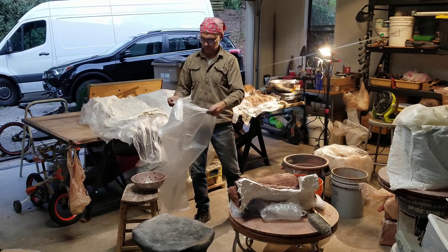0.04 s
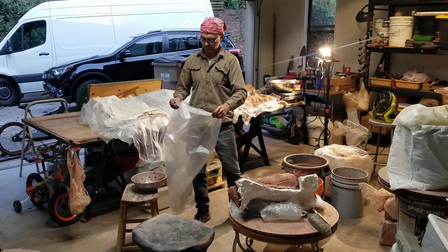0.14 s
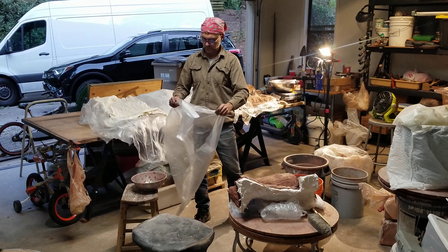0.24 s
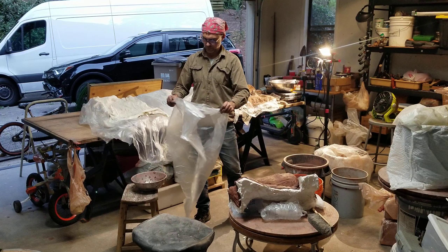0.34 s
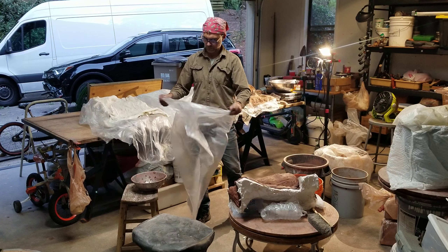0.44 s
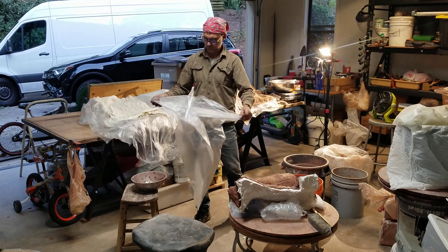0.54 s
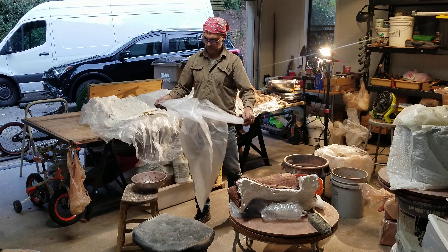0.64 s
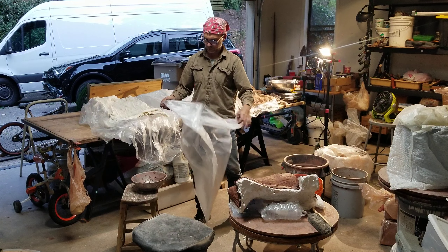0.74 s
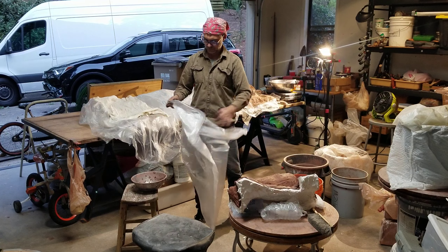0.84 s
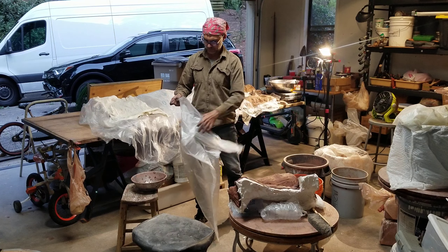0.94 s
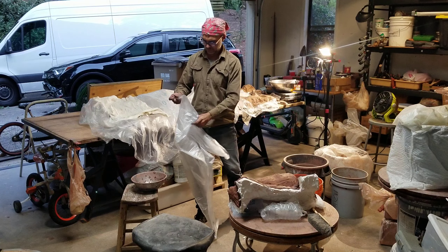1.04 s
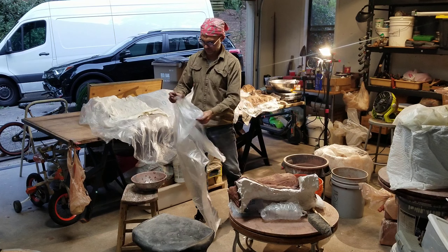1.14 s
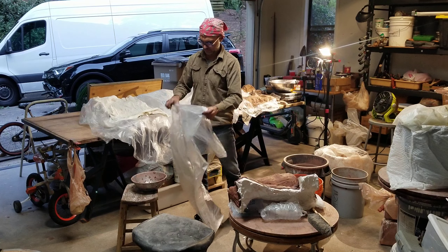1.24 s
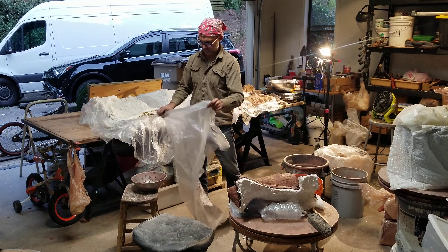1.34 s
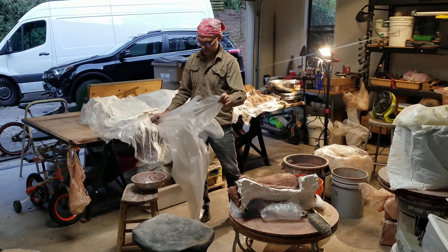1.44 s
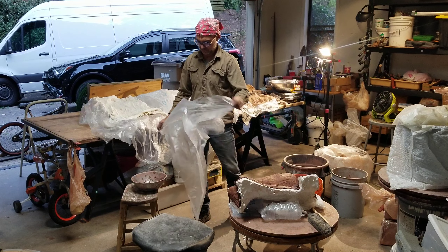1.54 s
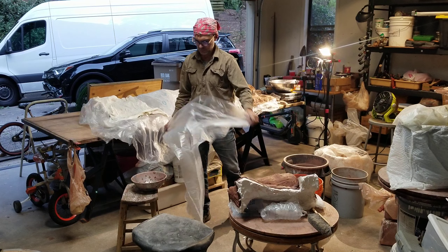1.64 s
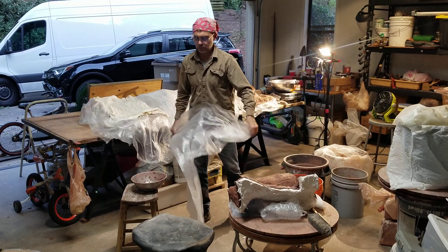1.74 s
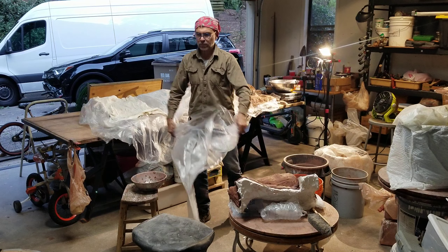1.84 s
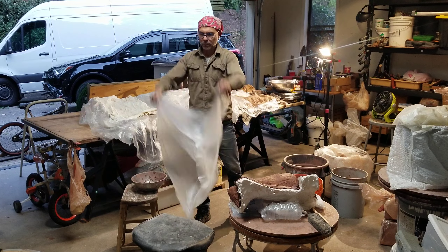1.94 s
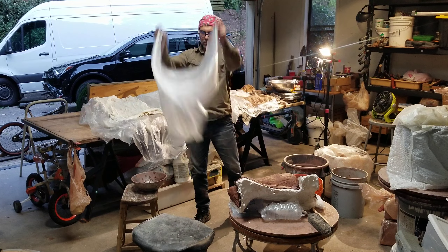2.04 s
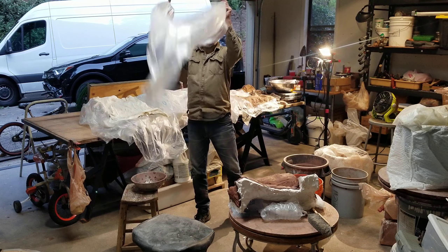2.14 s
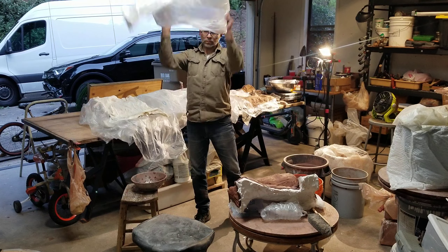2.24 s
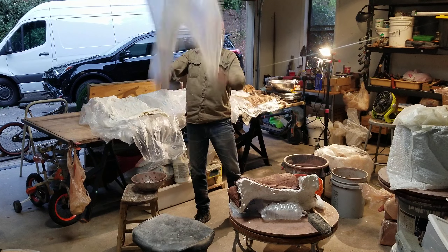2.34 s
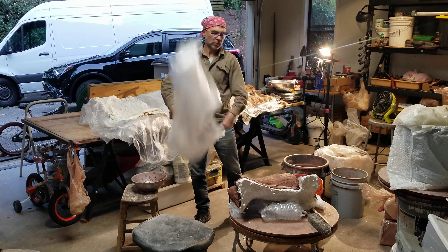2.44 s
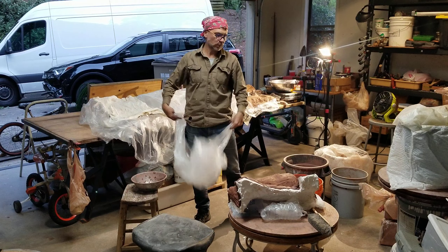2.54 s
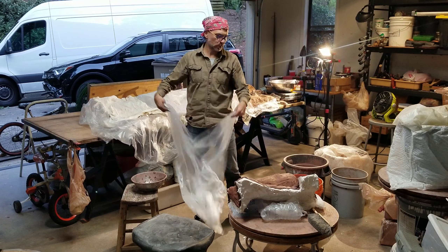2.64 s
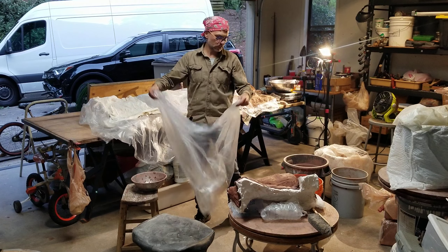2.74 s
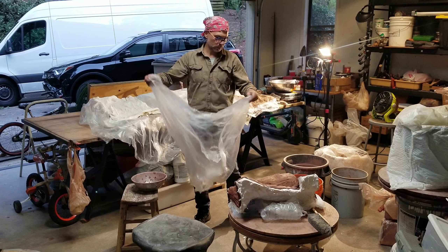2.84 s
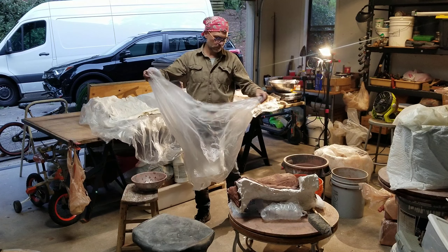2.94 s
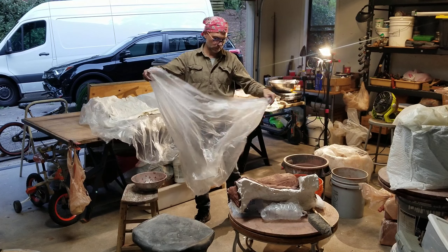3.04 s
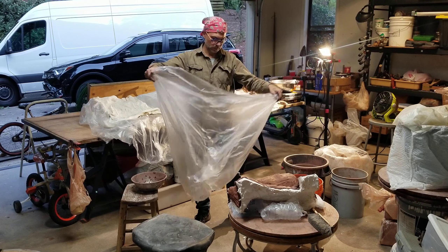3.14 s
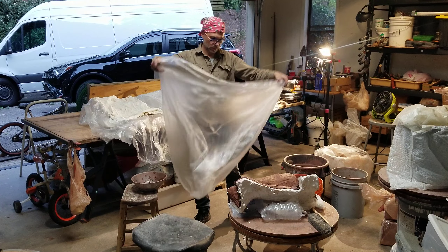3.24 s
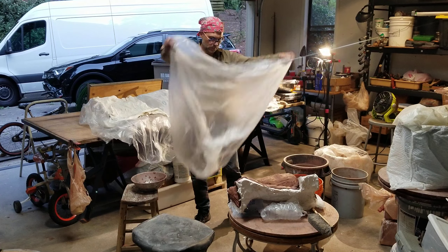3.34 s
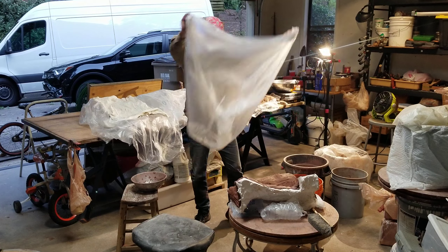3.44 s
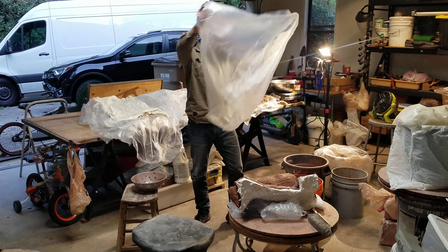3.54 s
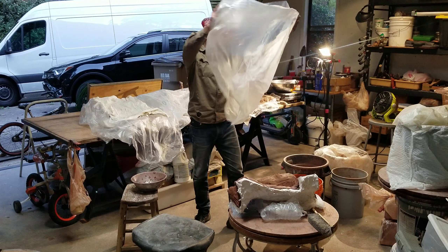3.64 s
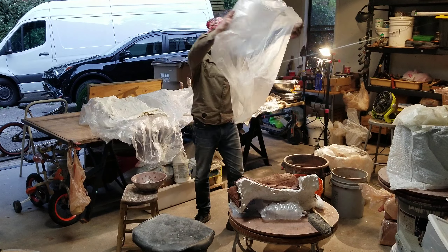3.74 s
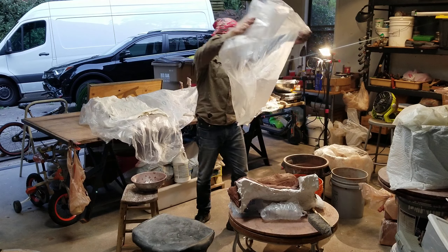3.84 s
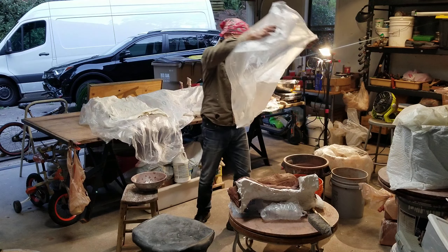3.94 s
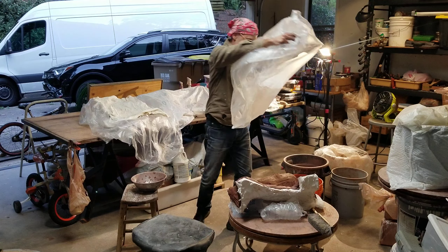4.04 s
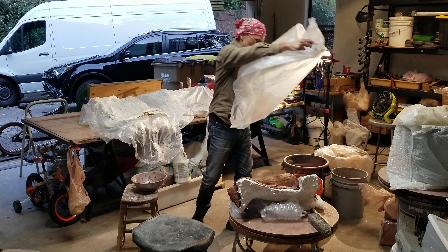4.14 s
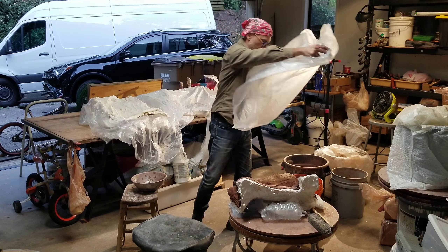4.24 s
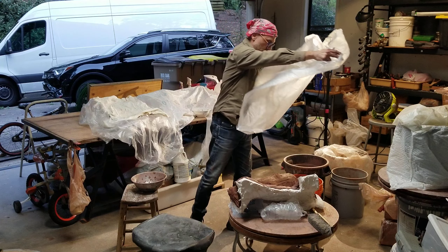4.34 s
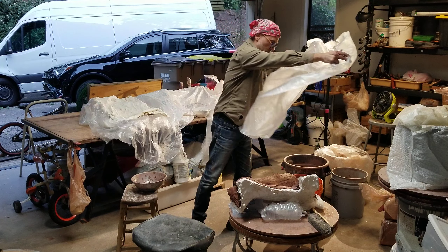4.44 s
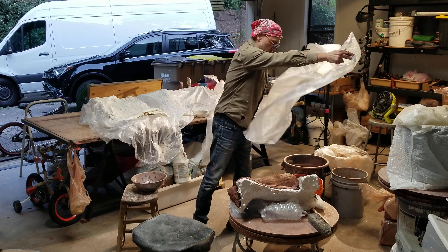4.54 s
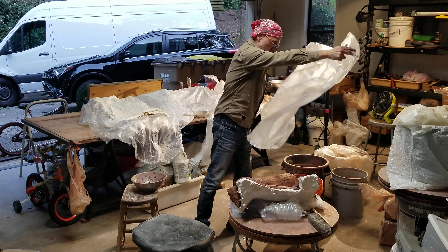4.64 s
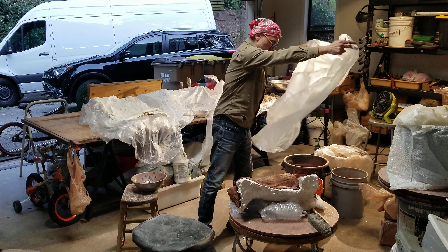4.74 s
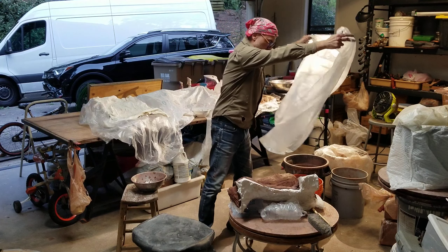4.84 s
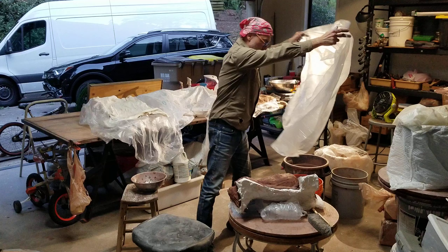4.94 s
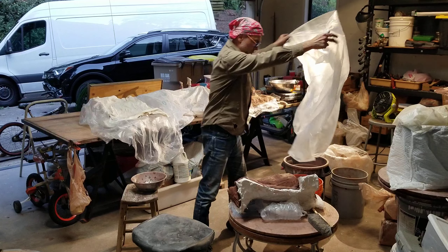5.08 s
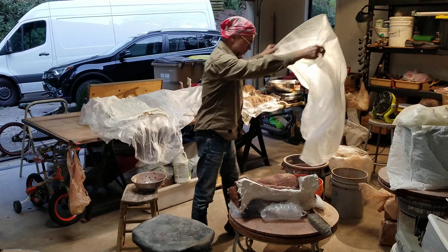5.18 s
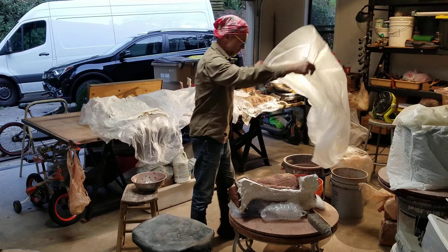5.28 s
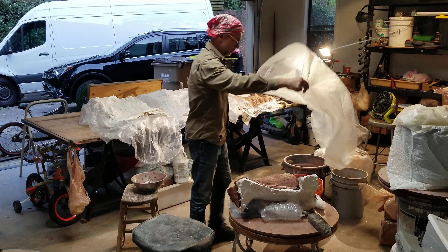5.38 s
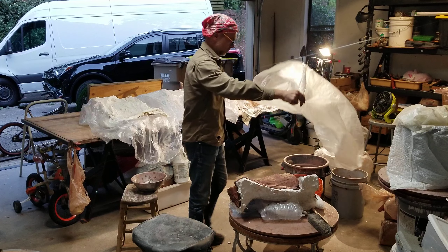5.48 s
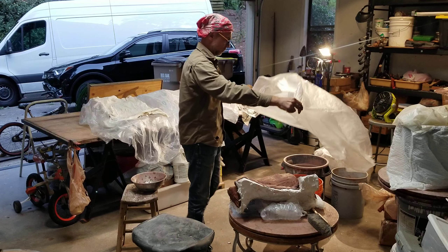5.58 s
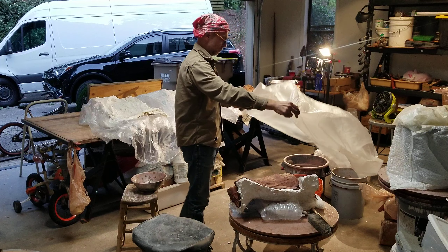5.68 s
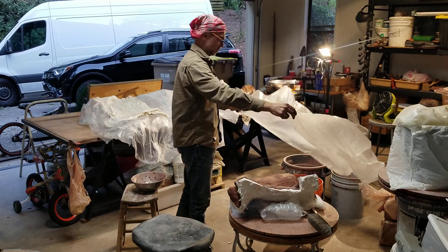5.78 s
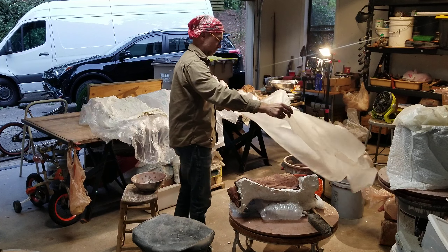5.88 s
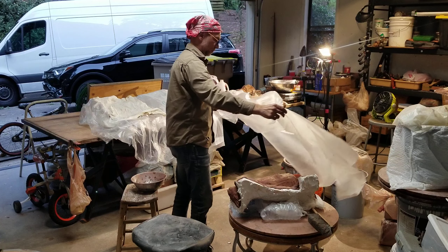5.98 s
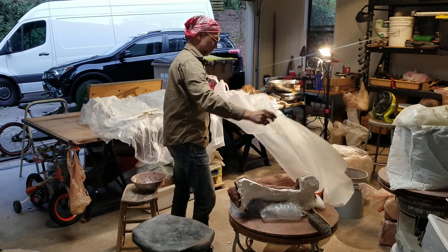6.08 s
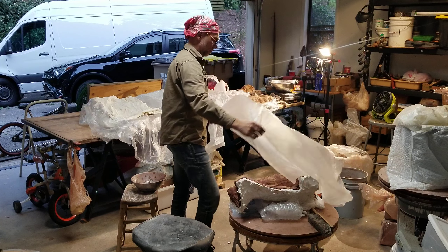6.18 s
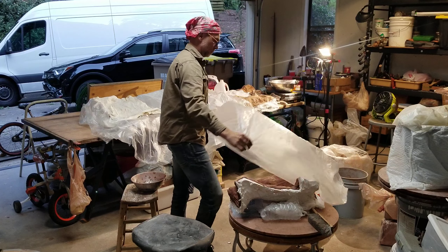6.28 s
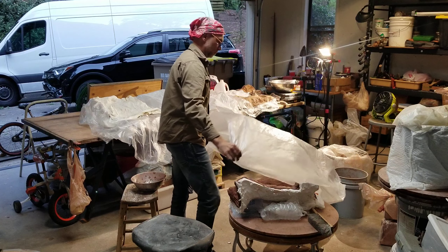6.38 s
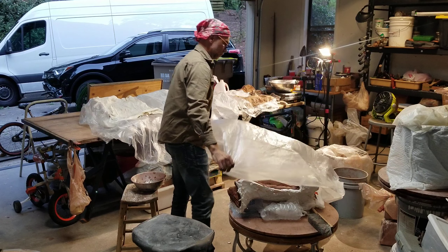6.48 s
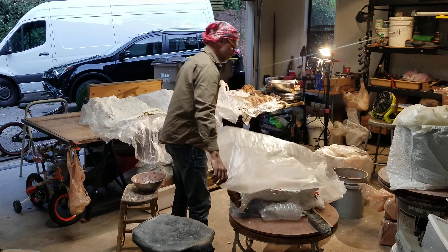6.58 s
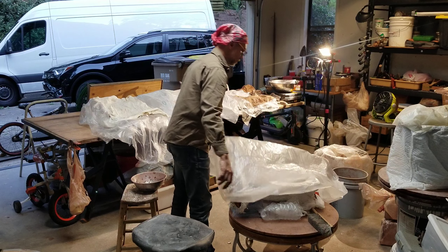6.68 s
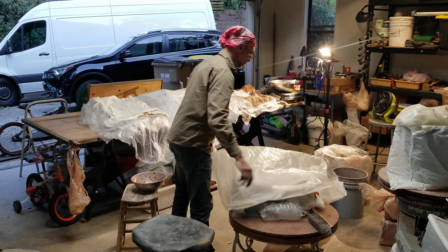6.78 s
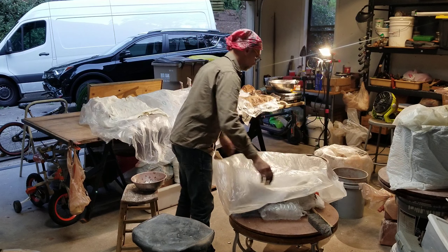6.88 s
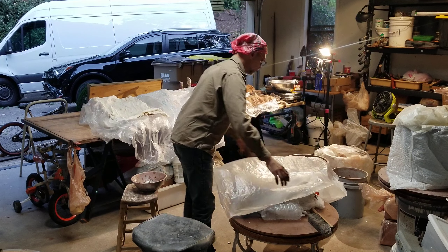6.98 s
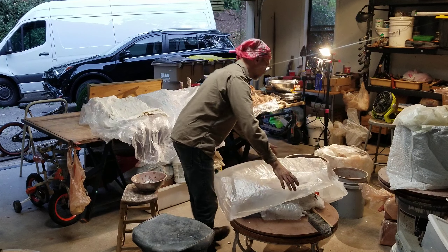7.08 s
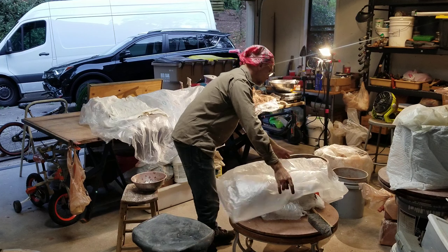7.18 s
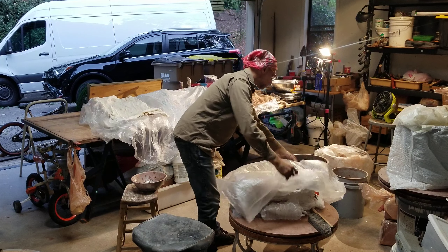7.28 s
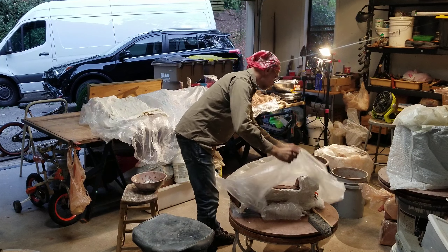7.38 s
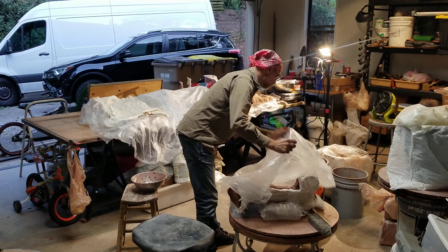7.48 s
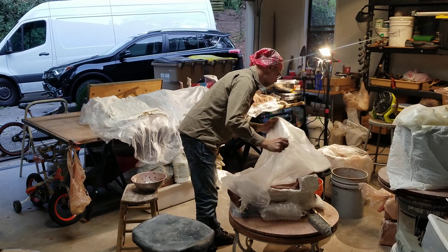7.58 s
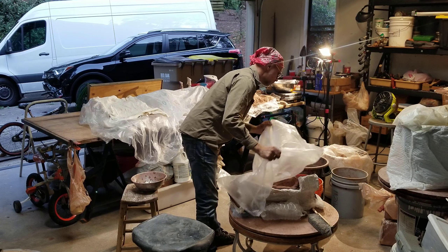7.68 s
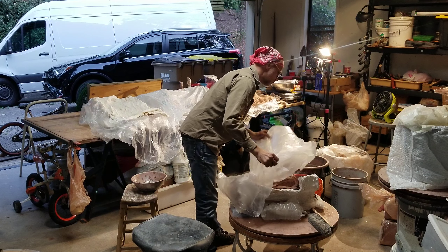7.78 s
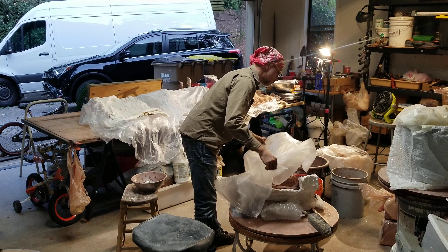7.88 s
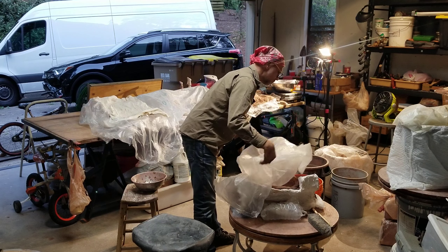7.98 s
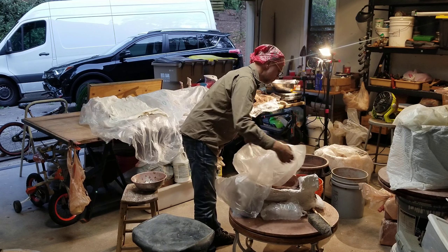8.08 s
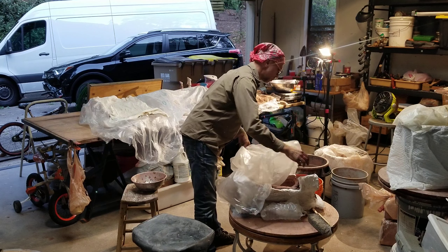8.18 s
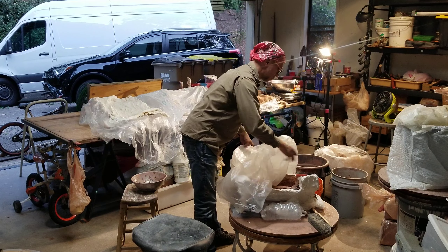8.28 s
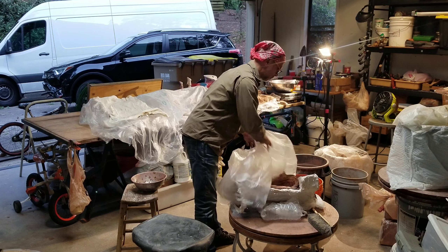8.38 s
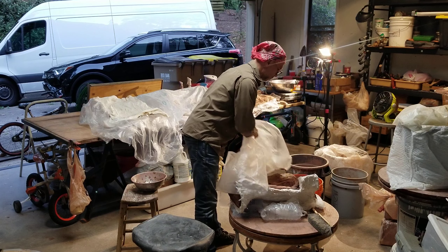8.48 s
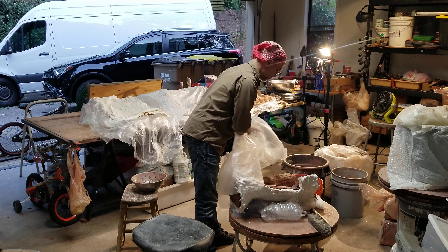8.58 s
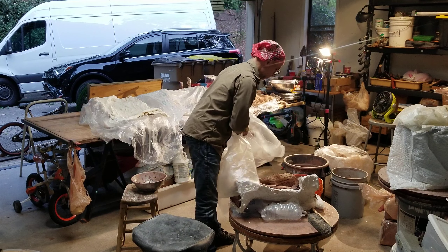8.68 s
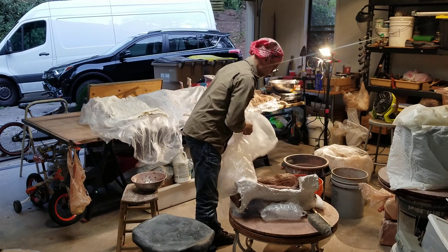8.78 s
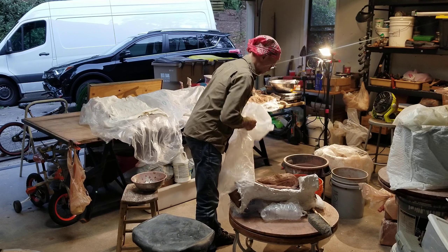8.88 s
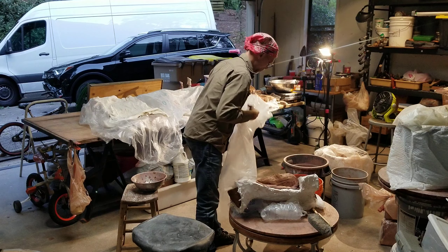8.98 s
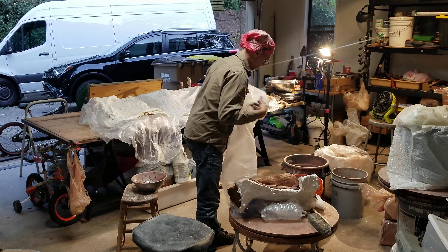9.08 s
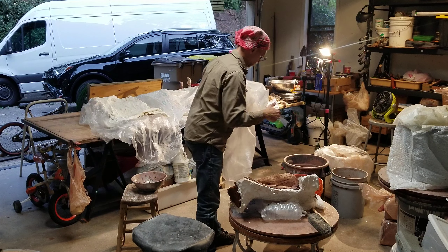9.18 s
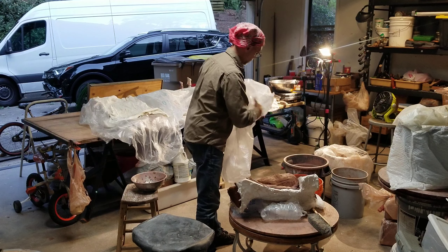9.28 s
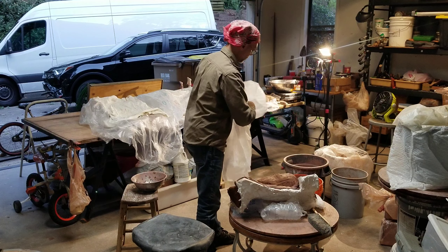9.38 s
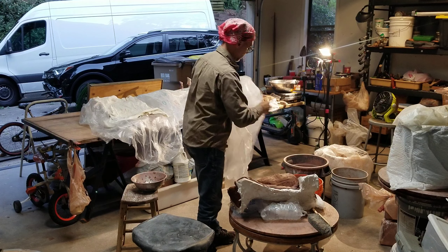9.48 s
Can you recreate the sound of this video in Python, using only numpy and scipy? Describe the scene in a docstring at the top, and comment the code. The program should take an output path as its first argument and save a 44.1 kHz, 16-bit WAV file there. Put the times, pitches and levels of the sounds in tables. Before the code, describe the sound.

Thin plastic film rustling continuously a few steps away, with two sharp, airy shakes early on, in a reverberant workshop.

```python
"""A thin plastic sheet crinkles as it is handled, shaken out twice and draped over clay in a garage.
Thousands of tiny creases buckle each second, each radiating a click, and large folds crumple under them.
Each shake displaces a puff of air, and the second slaps the film taut; once, it squeaks in the grip.
Soft footfalls and a low hum lie beneath. The sheet is a few steps away, so most of its sound
reaches the two microphone ports as reverberation."""
import sys
import numpy as np
from scipy import signal
from scipy.fft import rfft, irfft, next_fast_len
from scipy.io import wavfile

SR = 44100
rng = np.random.default_rng(int(sys.argv[2]) if len(sys.argv) > 2 else 0)


def waveform_to_disk(signal):
    """Save audio, clipped to [-1, 1], as 16-bit WAV at the path in sys.argv[1]."""
    frames = np.transpose(np.atleast_2d(signal))
    scaled = np.clip(frames, -1, 1) * 32767
    samples = np.round(scaled).astype(np.int16)
    wavfile.write(sys.argv[1], SR, samples)


N = 419812
TIME = np.arange(N) / SR

# Pulls, shakes and sweeps of the sheet. Each row: peak time in seconds, level in dB, rise and fall
# time constants in seconds.
STROKES = [(0.003, -37.5, 0.07, 0.2), (0.187, -43, 0.1, 0.42), (0.545, -31.0, 0.14, 0.056),
           (0.718, -41, 0.063, 0.054), (0.854, -38.5, 0.1, 0.062), (1.036, -41, 0.1, 0.14),
           (1.207, -38.5, 0.1, 0.18), (1.389, -33.0, 0.17, 0.19), (1.668, -41, 0.15, 0.31),
           (1.95, -22.0, 0.038, 0.099), (2.029, -32.5, 0.22, 0.04), (2.367, -20.5, 0.028, 0.08),
           (2.739, -35.5, 0.27, 0.15), (3.138, -46.5, 0.12, 0.27), (3.406, -38.5, 0.28, 0.28),
           (3.759, -42.5, 0.2, 0.4), (4.78, -43, 0.12, 0.29), (5.005, -44.5, 0.17, 0.24),
           (5.204, -42.5, 0.25, 0.34), (5.607, -46, 0.17, 0.13), (5.893, -41, 0.19, 0.16),
           (6.14, -40, 0.1, 0.18), (6.368, -41, 0.15, 0.13), (6.542, -45.5, 0.23, 0.36),
           (6.939, -48, 0.24, 0.1), (7.23, -40, 0.071, 0.39), (7.432, -33.5, 0.22, 0.19),
           (7.733, -38, 0.13, 0.17), (8.05, -38.5, 0.15, 0.23), (8.399, -33.0, 0.064, 0.16),
           (8.76, -39, 0.29, 0.25), (8.976, -41.0, 0.25, 0.095), (9.127, -42, 0.12, 0.15),
           (9.342, -35, 0.041, 0.16), (9.513, -33.5, 0.07, 0.027)]
HELD_DB, EASY_DB = -56, -40  # crinkle of the sheet held still, and in an easy stroke
UNEVEN_DB, CATCHES_PER_S = 0.45, 20  # the film catches and slips within each stroke
# Spectra of creases, folds, puffs and outdoor rumble. Each row: frequency in Hz, relative level in dB.
CREASE_SPECTRUM = [(500, -7.6), (1200, -3.8), (2200, -0.4), (3000, -0.1), (5200, 0.0), (6400, -2.3),
                   (7200, -4.6), (8200, -4.4), (9300, -6.8), (10300, -5.2), (11300, -2.1), (12500, -0.3),
                   (14200, -3.2), (15600, -7.0)]
FOLD_SPECTRUM = [(100, -20), (135, -12), (200, -13.5), (280, -8.5), (340, 0.5), (420, -1.5), (520, -0.5),
                 (620, -1), (880, 1), (1400, 3), (2200, 9.5)]
PUFF_SPECTRUM = [(12, -51), (25, -20), (45, -10), (80, -3), (130, -5), (190, -4.5), (270, -8), (400, -29),
                 (800, -61)]
RUMBLE_SPECTRUM = [(15, -46), (30, -6), (55, 3), (85, -13), (135, -2.5), (200, -11), (500, -12.5),
                   (2000, -9.5), (15000, -66)]
# Layers that follow the strokes. Each holds: level at an easy stroke in dB, dB gained per dB of
# crinkle, lag in seconds.
SMALL_FOLD_LAW = (-52.5, 1.146, 0.0073)
WIDE_FOLD_LAW = (-65.5, 1.36, 0.0099)
BOOM_LAW = (-74, .35, .02)
# Folds grow louder as the sheet bunches. Each row: time in seconds, gains of small and wide folds in dB.
BUNCHING = [(0, 1, 3.5), (.7, -0.5, 3), (.95, -1, -2), (1.4, -2, 1), (1.78, -1, 0.5), (2.02, 1.5, 6),
            (2.38, 3.5, 3), (2.72, -2, 0.5), (4.5, -1.5, -2.5), (5.1, -1.5, 0.5), (5.55, -1, -5),
            (6.1, 1, 4.5), (6.5, 0, 0.5), (6.85, 0, -7), (7.45, -1, 1), (8.05, 0, -1.5), (9.2, 0.5, 3)]
# Air pushed by the fastest sweeps. Each row: peak time in seconds, level in dB, rise and fall
# time constants in seconds.
PUFFS = [(1.965, -40, 0.028, 0.067), (2.415, -38, 0.028, 0.044), (7.48, -60.5, 0.14, 0.17),
         (8.45, -68, .08, 0.13)]
STILL_DB, RUMBLE_DB = -89, -71  # air between the puffs; outdoor rumble
# The film jerks taut. Each row: time in seconds, relative level in dB, pitch in Hz, decay in seconds.
SLAPS = [(2.36, -24, 1700, 0.0039), (2.3659, -30, 600, 0.0033), (2.4072, -18, 570, 0.0045)]
# The sheet swings to a stop: start in seconds, level in dB, pitch in Hz, decay in seconds.
THUMP = (2.405, -31, 64, 0.07)
# Single stiff creases. Each row: start in seconds, relative level in dB.
POPS = [(0.545, -26), (1.923, -16), (2.376, -25), (5.562, -34), (5.607, -35), (6.546, -36), (7.417, -28),
        (7.54, -26), (8.061, -27.5)]
# Slips in the grip. Each row: start in seconds, length in seconds, pitch in Hz, relative level in dB.
SQUEAKS = [(7.16, 0.11, 1595, -49)]
# Thuds of the shoes. Each row: start in seconds, relative level in dB, pitch in Hz.
STEPS = [(6.33, -67, 60), (6.495, -61, 62), (6.5, -59, 134), (6.51, -62, 210), (6.999, -65, 58),
         (7.262, -50, 56.5)]
# Cavities among benches and pots. Each row: frequency in Hz, relative level in dB, T60 in seconds.
HOLLOWS = [(275, -46, 0.23), (413.4, -39.5, 0.19), (706, -42, 0.1), (796, -34.5, 0.087), (918, -45, .15),
           (1150, -56, .2), (1639, -47, .2)]
# Reverberation of the garage. Each row: frequency in Hz, T60 in seconds.
GARAGE_T60 = [(100, 0.72), (500, 0.25), (2000, 0.8), (6000, 0.88), (15000, 0.2)]
# Unequal colour of the ports. Each row: frequency in Hz, level of left over right in dB.
PORT_BALANCE = [(100, 0.8), (1000, 1.3), (2500, 2.4), (5000, 3.9), (6400, -0.7), (7200, -8.0),
                (8200, -15.1), (9000, -18.5), (10000, -13.4), (11500, -9.6), (13200, -5.4), (14500, -8.2),
                (15500, -8.7)]
FIRST_NULL_HZ = 1040  # port spacing leaves the diffuse sound uncorrelated at multiples of this
BAND_LIMIT_HZ = 15780


def crinkle(level_db, highpass_hz=1400, fizz_hz=7000, fizz_db_per_db=0.1478):
    """Buckling of tiny creases: faster movement sets off more of them and makes them brighter."""
    per_s = 5000 * gain_of(.5 * (level_db + 39.5))
    clicks = buckling(per_s, spread_db=2.5, clump_db=1.5, direct=0.7, hollow=.03, patches=9)
    clicks /= np.sqrt(per_s)  # keeps power independent of click rate
    sound = evened(shaped(clicks, lambda f: gain_of(read(CREASE_SPECTRUM, f))
                          * f ** 3 / np.sqrt(f ** 6 + highpass_hz ** 6)))
    fizz = shaped(sound, lambda f: f ** 2 / (f ** 2 + fizz_hz ** 2))
    fizz_gain = gain_of(fizz_db_per_db * (level_db - level_db.mean()))
    return (sound + fizz * (fizz_gain - 1)) * gain_of(level_db)


def folds(level_db, top_hz=1400, wide_hz=490):
    """Buckling on a larger scale: folds flip with a dull crumple, and the widest sound deepest."""
    times, small_extra_db, wide_extra_db = np.transpose(BUNCHING)
    small_db = following(level_db, *SMALL_FOLD_LAW) + np.interp(TIME, times, small_extra_db)
    wide_db = following(level_db, *WIDE_FOLD_LAW) + np.interp(TIME, times, wide_extra_db)
    clicks = buckling(per_s=1800, spread_db=3.0, clump_db=1.5, direct=0.34, hollow=0.1, patches=7)
    sound = shaped(clicks, lambda f: gain_of(read(FOLD_SPECTRUM, f)) / np.sqrt(1 + (f / top_hz) ** 6))
    wide = shaped(sound, lambda f: 1 / (1 + (f / wide_hz) ** 8))
    return evened(sound - wide) * gain_of(small_db) + evened(wide) * gain_of(wide_db)


def buckling(per_s, spread_db, clump_db, direct, hollow, patches):
    """Elastic instability: neighbouring patches of film give way in avalanches of unequal clicks."""
    heard = np.zeros((2, N))
    for left_shift in np.linspace(-7, 3, patches):
        onsets = np.flatnonzero(rng.random(N) < per_s / patches / SR)
        draw = rng.laplace(size=N)[onsets]
        size_db = spread_db * np.minimum(abs(draw), 4.5) + clump_db * wander(110)[onsets]
        clicks = np.bincount(onsets, np.sign(draw) * gain_of(size_db), N)
        heard += garage(clicks, direct, left_shift, hollow)
    return heard


def billow():
    """Displacement of air: the flapping sheet drives lumpy, low puffs."""
    return low_air(lambda f: gain_of(read(PUFF_SPECTRUM, f))) * gain_of(swells(PUFFS, STILL_DB))


def slaps(flutter=0.89, flips_per_s=1500, lead_s=.002):
    """Sudden tension: the film snaps taut with a push and suction, flutters, and swings to a stop."""
    snaps, thump = np.zeros((2, N))
    t = np.arange(SR // 10) / SR
    for start, db, hz, decay_s in SLAPS:
        phase = 2 * np.pi * hz * (t - lead_s)
        pulse = phase * np.exp((1 - phase ** 2) / 2)
        flips = rng.choice([-1, 1], len(t)) * (rng.random(len(t)) < flips_per_s / SR)
        flips = flips * flutter * np.exp(-t / decay_s)
        flips[t < .5 / hz] = 0
        flips[0] = 1  # the main snap stands alone for half a cycle
        add(snaps, start - lead_s, gain_of(db) * signal.fftconvolve(flips, pulse))
    start, db, hz, decay_s = THUMP
    add(thump, start, gain_of(db) * np.sin(2 * np.pi * hz * t) * np.exp(-t / decay_s))
    return 0.55 * garage(snaps, direct=2.5, left_shift=-2.5, hollow=0.28) + thump


def pops(pitch_hz=4500, decay_s=0.00047):
    """Snap-through: a stiff crease gives way with a damped tick of a cycle or two."""
    track, t = np.zeros(N), np.arange(SR // 100) / SR
    for start, db in POPS:
        add(track, start, gain_of(db) * np.cos(2 * np.pi * pitch_hz * t) * np.exp(-t / decay_s))
    return 2.0 * garage(track, direct=.6, left_shift=-1.1, hollow=.05)


def squeaks(jitter=0.018):
    """Stick-slip friction: film under the fingers sounds a faint, unsteady tone."""
    track = np.zeros(N)
    for start, length_s, hz, db in SQUEAKS:
        pitch_hz = hz * (1 + jitter * wander(260)[:round(length_s * SR)])
        phase = 2 * np.pi * np.cumsum(pitch_hz) / SR
        add(track, start, gain_of(db) * np.hanning(len(phase)) * np.sin(phase))
    return garage(track, direct=1.3, hollow=0)


def steps(rise_s=0.019):
    """Soft impact: shoes settle gradually on the floor, giving only low thuds."""
    track, t = np.zeros(N), np.arange(SR // 3) / SR
    envelope = t / rise_s * np.exp(1 - t / rise_s)
    for start, db, hz in STEPS:
        add(track, start, gain_of(db) * envelope * np.sin(2 * np.pi * hz * t))
    return 0.34 * garage(track, direct=3.5, hollow=0)


def hum(level_db, boom_hz=57, width_hz=28):
    """Room resonance: a boom swells as the air is stirred, over outdoor rumble from the open door."""
    rumble = low_air(lambda f: gain_of(read(RUMBLE_SPECTRUM, f)), apart=0.7)
    rumble *= gain_of(RUMBLE_DB + 0.58 * wander(2.4))
    boom = low_air(lambda f: 1 / (1 + (2 * (f - boom_hz) / width_hz) ** 2) / (1 + (f / 150) ** 4))
    return rumble + boom * gain_of(following(level_db, *BOOM_LAW))


def low_air(spectrum, apart=0.19):
    """Coherence of long waves: noise largely shared by both ports, with a part in opposite phase."""
    shared, differing = rng.standard_normal((2, N))
    return evened(shaped(shared + apart * differing * np.array([[1], [-1]]), spectrum))


def garage(sound, direct, left_shift=0., hollow=0.8):
    """Reverberation: a diffuse tail joins the direct path, and both can set the cavities ringing."""
    size, lead = 2 ** 15, 20  # samples
    t, f = np.arange(size) / SR, np.fft.rfftfreq(size, 1 / SR)
    echoes = rng.standard_normal((2, size)) * (rng.random((2, size)) < 5000 / SR) * (t > .002)
    echoes *= 1 + 0.29 * np.exp(-t / 0.0043)  # floor, tables and shelves answer first
    band_hz, age_s, bands = signal.stft(echoes, SR, nperseg=256)
    t60 = read(GARAGE_T60, band_hz)[:, None]
    tail = signal.istft(bands * gain_of(-60 * age_s / t60) / np.sqrt(t60), SR, nperseg=256)[1][:, :size]
    left, unrelated = rfft(tail / np.linalg.norm(tail, axis=1, keepdims=True))
    coherence = np.sinc(f / FIRST_NULL_HZ)
    paths = np.array([left, coherence * left + np.sqrt(1 - coherence ** 2) * unrelated])
    # a negative shift, in samples, brings the direct sound to the left port earlier
    paths += direct * np.exp(-2j * np.pi * f / SR * (lead + np.array([[left_shift], [0]])))
    ring = sum(gain_of(db - 60 * t / ring_s) * np.cos(2 * np.pi * hz * t) for hz, db, ring_s in HOLLOWS)
    response = irfft(paths * (1 + hollow * rfft(ring)))
    running = np.r_[sound[-size:], sound]  # the room is already sounding at the start
    return signal.oaconvolve(running[None], response, axes=1)[:, size + lead:][:, :N]


def swells(rows, rest_db):
    """Incoherent addition: the powers of exponential swells sum to one level in dB."""
    power = gain_of(rest_db) ** 2
    for peak_s, db, rise_s, fall_s in rows:
        away = np.maximum((peak_s - TIME) / rise_s, (TIME - peak_s) / fall_s)
        power = power + (gain_of(db) * np.exp(-np.minimum(away, 20))) ** 2
    return 10 * np.log10(power)


def following(level_db, easy_db, growth, lag_s):
    """Power law: the level in dB of a layer that trails the crinkle and grows at its own rate."""
    return easy_db + growth * (np.interp(TIME - lag_s, TIME, level_db) - EASY_DB)


def wander(per_s):
    """Random fluctuation of rms 1, interpolated between knots."""
    knots = rng.standard_normal(N // 20)
    return evened(np.interp(TIME * per_s, np.arange(len(knots)), knots))


def shaped(sound, gain):
    """Linear filtering by a gain given as a function of frequency."""
    size = next_fast_len(N + SR // 10)
    return irfft(rfft(sound, size) * gain(np.fft.rfftfreq(size, 1 / SR)), size)[..., :N]


def read(table, hz):
    """Interpolation of a table on a log-frequency axis."""
    f, value = np.transpose(table)
    return np.interp(np.log(hz + 1), np.log(f + 1), value)


def add(track, start_s, sound):
    """Superposition of a sound on a mono track."""
    part = track[round(start_s * SR):][:len(sound)]
    part += sound[:len(part)]


def evened(sound):
    """Normalisation: the mean of the channels gets rms 1."""
    return sound / np.sqrt(np.mean(np.atleast_2d(sound).mean(0) ** 2) + 1e-20)


def gain_of(db):
    """Amplitude ratio of a level in decibels."""
    return 10 ** (np.asarray(db) / 20)


def scene():
    """Superposition of all sources; one movement of the hands drives creases, folds and room boom."""
    level_db = swells(STROKES, HELD_DB) + UNEVEN_DB * wander(CATCHES_PER_S)
    sheet = crinkle(level_db) + folds(level_db) + billow() + slaps() + pops()
    return sheet + steps() + hum(level_db) + squeaks()


def record(dry):
    """Frequency response: the ports share each band's power unequally, then a low-pass limits both."""
    sides = np.array([[-2], [2]])
    ported = shaped(dry, lambda f: np.sqrt(2 / (1 + gain_of(sides * read(PORT_BALANCE, f)))))
    lowpass = signal.firwin(511, BAND_LIMIT_HZ, window=("kaiser", 9), fs=SR)
    return signal.oaconvolve(ported, lowpass[None], "same")


dry = scene()
out = record(dry)
waveform_to_disk(out)
```